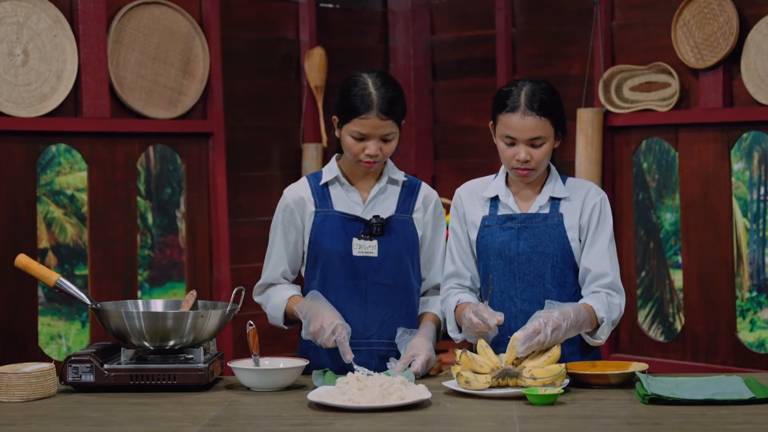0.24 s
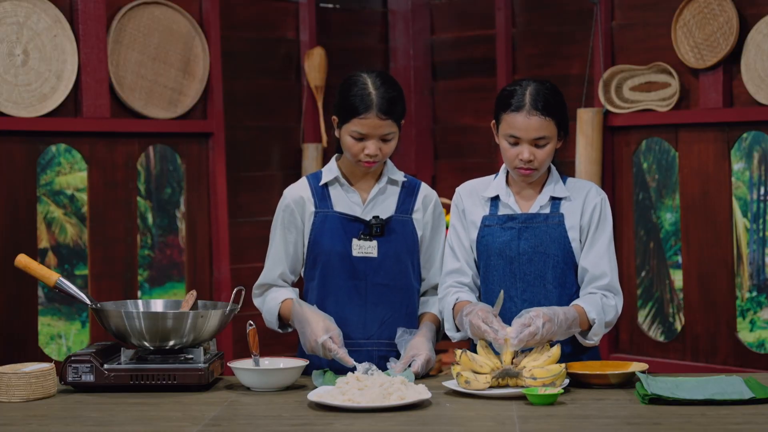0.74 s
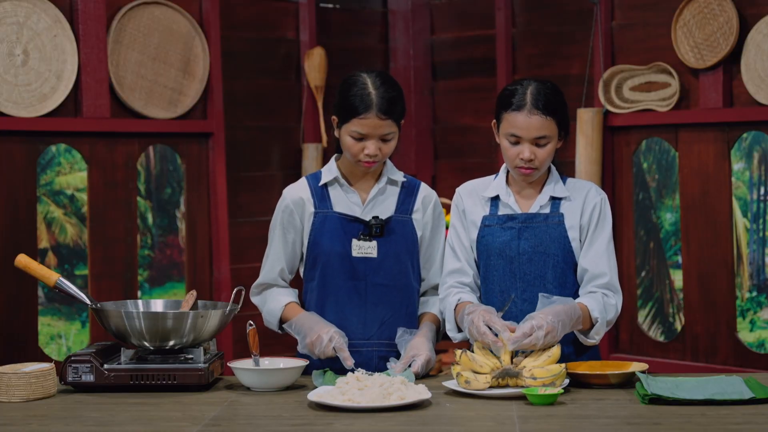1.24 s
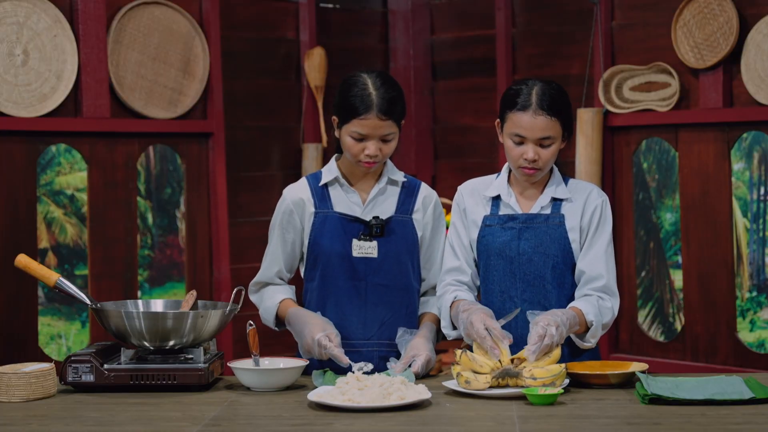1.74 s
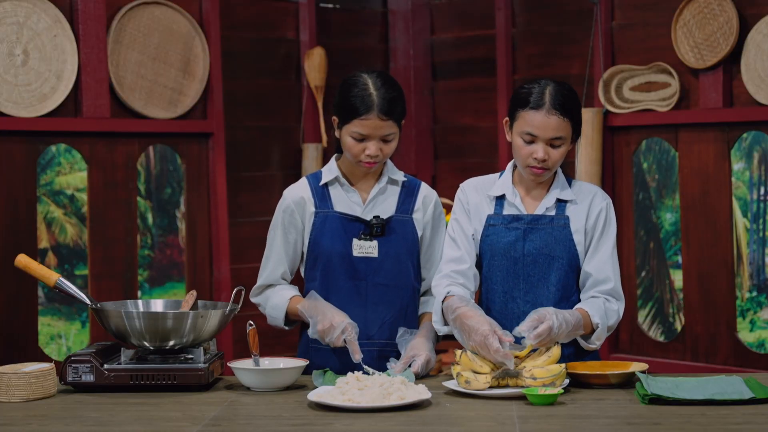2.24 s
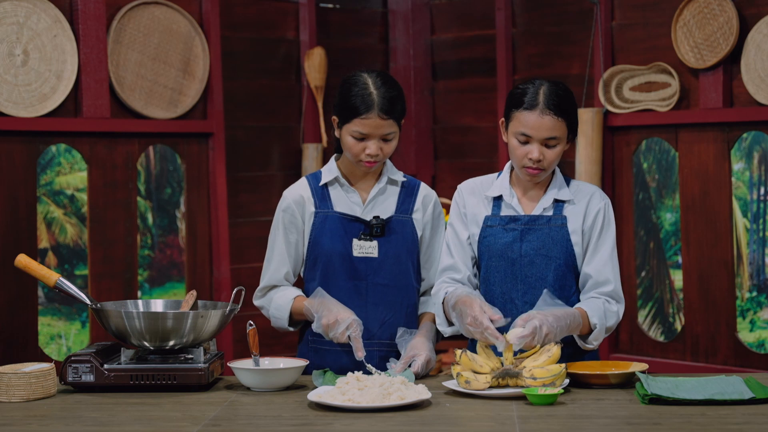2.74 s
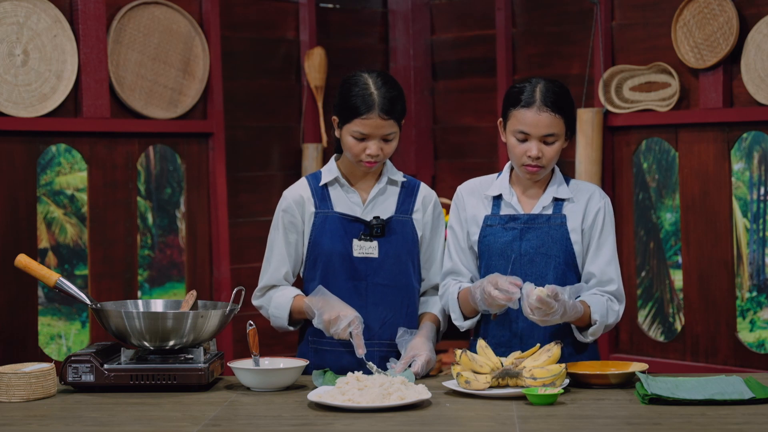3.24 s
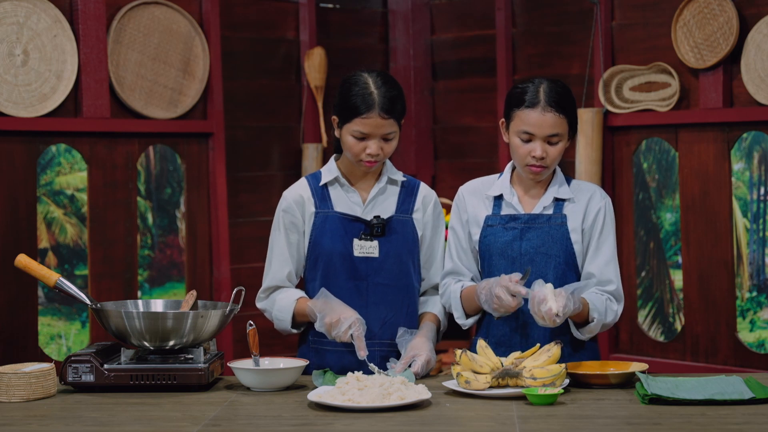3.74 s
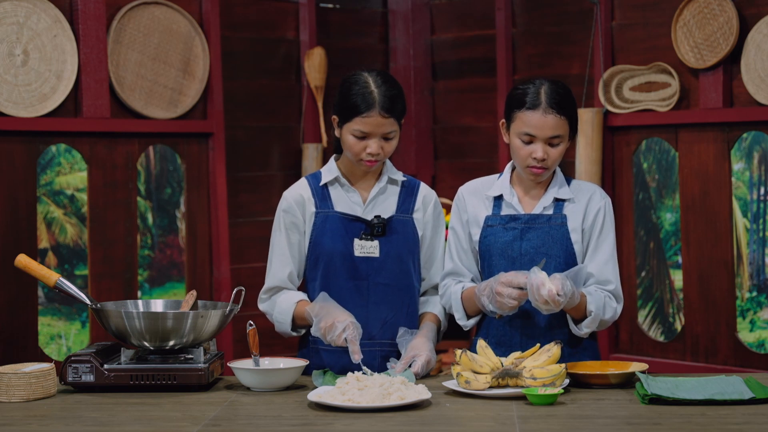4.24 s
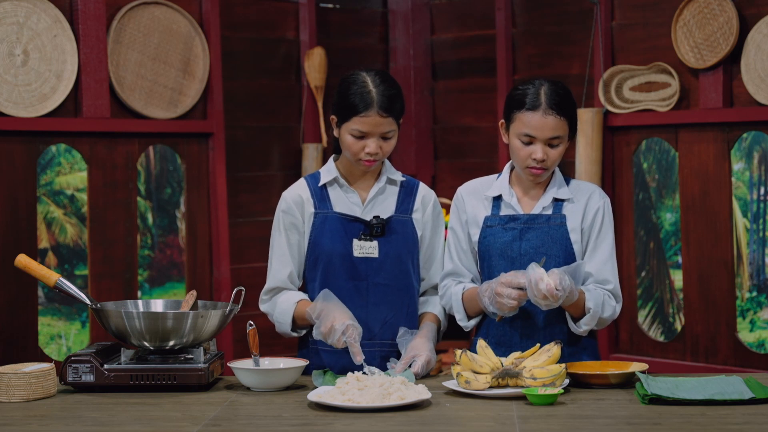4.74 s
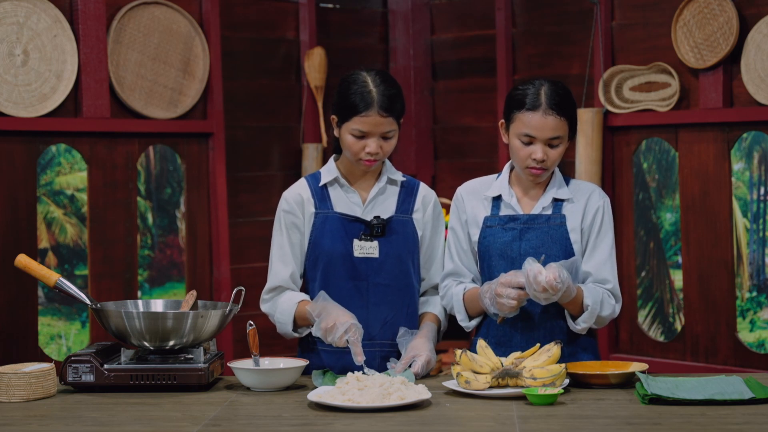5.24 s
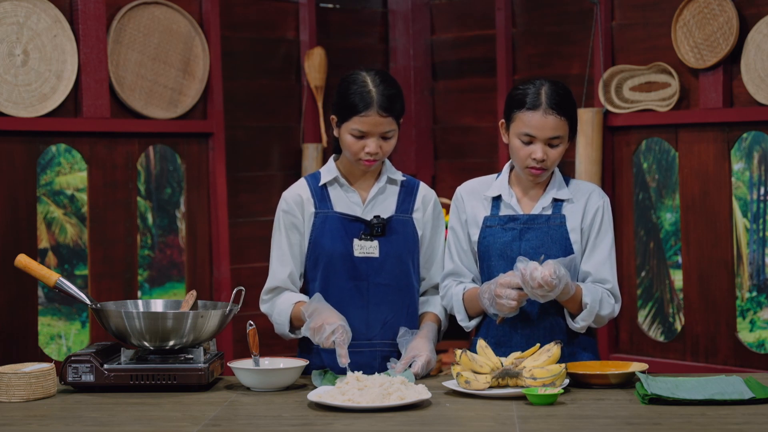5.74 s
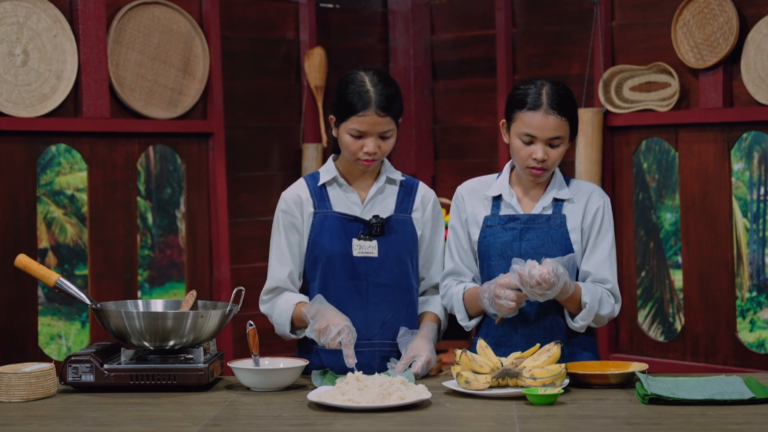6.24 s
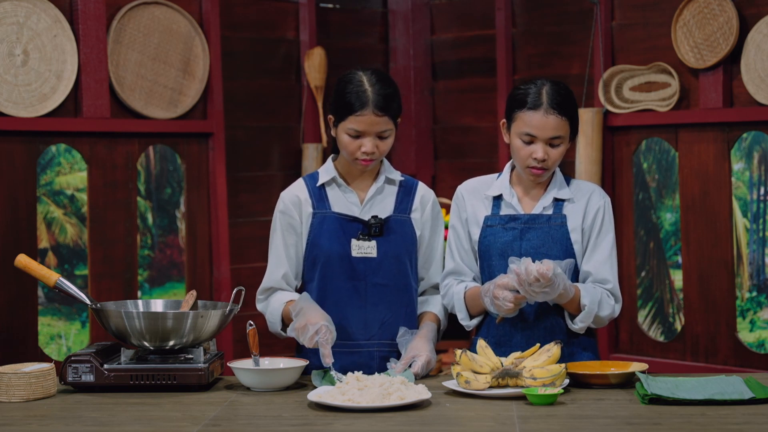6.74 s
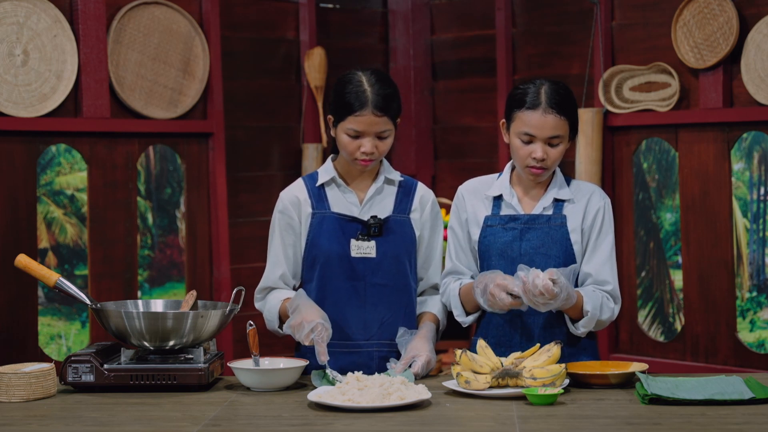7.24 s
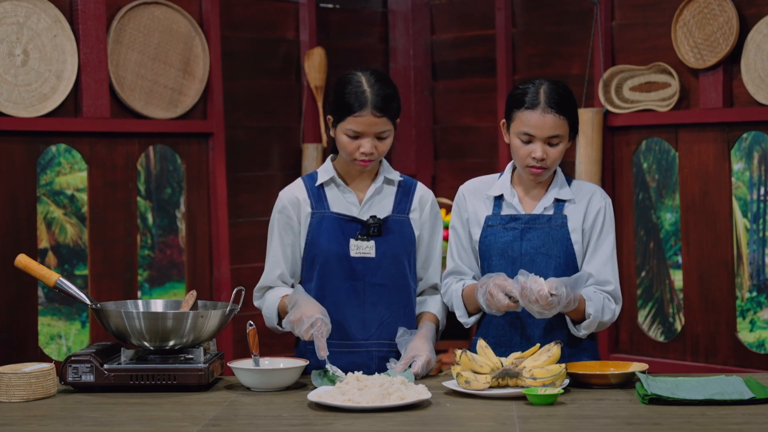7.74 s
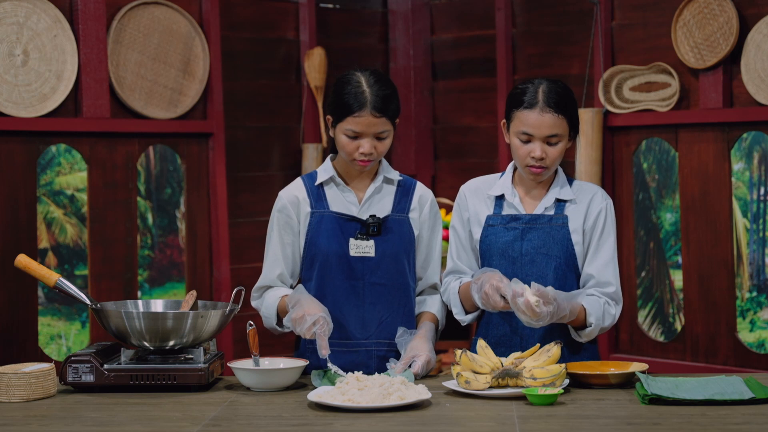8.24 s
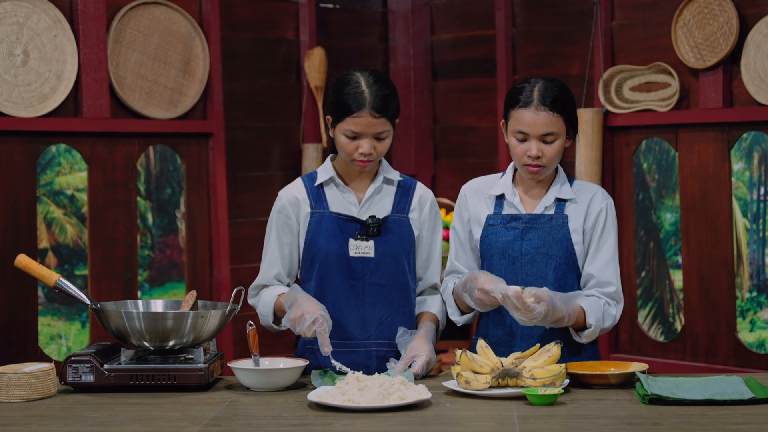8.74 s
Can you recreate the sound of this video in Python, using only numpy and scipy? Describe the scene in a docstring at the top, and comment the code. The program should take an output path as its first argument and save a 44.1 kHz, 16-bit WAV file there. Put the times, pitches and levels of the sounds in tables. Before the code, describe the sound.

Close clip-on microphone in a quiet indoor kitchen: flimsy film gloves crackle, fizz and rustle as fingers grip and pull peel. Strokes are nearly continuous early, strongest around three and a half seconds, then slacken into thin ticking before picking up again near seven. Muffled taps and scuffs on soft fruit sit beneath. Low cloth-padded bumps arrive in groups above a faint bassy room rumble.

```python
"""Gloved hands peeling bananas

Two cooks in thin plastic gloves peel bananas and work at a plate in a wooden kitchen room.
The film buckles in clumps of tiny ringing clicks, with single louder snaps; shaped noise makes the
soft rubbing and tapping on the fruit. Body movements bump a clip-on microphone: each dull thump is
a short low push and rebound. Steady coloured noise gives the low room rumble."""
import sys
import numpy as np
from scipy import signal
from scipy.fft import rfft, irfft, next_fast_len
from scipy.io import wavfile
from scipy.ndimage import uniform_filter1d, map_coordinates

SR = 44100
rng = np.random.default_rng(int(sys.argv[2]) if len(sys.argv) > 2 else 0)


def unload_audio(sound):
    """Save the sound as a 16-bit wav file, at the path given as the first command line argument."""
    columns = np.transpose(np.atleast_2d(sound))
    # keep every value between -1 and 1, then stretch to whole-number steps
    steps = np.round(np.clip(columns, -1, 1) * 32767)
    wavfile.write(sys.argv[1], SR, steps.astype(np.int16))


N = 396900
TOP_HZ = 15850  # nothing is recorded above this


def amp(db):
    """Decibels to gain."""
    return 10 ** (np.asarray(db) / 20)


def unit(x):
    """x at rms 1."""
    return x / np.sqrt(np.mean(x ** 2) + 1e-20)


def even(x, span):
    """x at rms 1 over every stretch of span seconds."""
    power = np.abs(uniform_filter1d(x ** 2, int(span * SR) + 1))
    return x / np.sqrt(power + 1e-9)


def along(points, hz):
    """(Hz, value) points read on a log axis."""
    f, v = np.transpose(points)
    return np.interp(np.log(hz + 1), np.log(f + 1), v)


def curves(rows):
    """One value per sample for each column after the time."""
    s, *cols = np.transpose(rows)
    return [np.interp(np.arange(N) / SR, s, c) for c in cols]


def wobble(rate):
    """A smooth random curve through rate random points a second."""
    points = rng.standard_normal(int(N * rate / SR) + 4)
    return map_coordinates(points, [np.arange(N) * rate / SR])


def below(x, hz):
    """The part of x under a frequency, with no delay."""
    return signal.sosfiltfilt(signal.butter(3, hz, fs=SR, output="sos"), x)


def coloured(x, gain):
    """x through a filter that never sounds ahead of its input; gain is a function of frequency."""
    m = 2 * next_fast_len(N // 2 + SR // 4)
    log_gain = np.log(np.maximum(gain(np.fft.rfftfreq(m, 1 / SR)), 1e-6))
    # folding the cepstrum onto positive times gives the minimum-phase response
    cepstrum = irfft(log_gain)
    cepstrum[1:m // 2] *= 2
    cepstrum[m // 2 + 1:] = 0
    return irfft(rfft(x, m) * np.exp(rfft(cepstrum)), m)[:N]


def noise(spectrum):
    """Noise of rms 1 with a given colour."""
    return unit(coloured(rng.standard_normal(N), lambda hz: amp(along(spectrum, hz))))


def scattered(x, t60, wet_db):
    """x plus a diffuse noise tail, redrawn at random every short block; t60 is its 60 dB decay in s."""
    t = np.arange(int(t60 * SR) + 2) / SR
    out = np.zeros(N + len(t))
    hop = max(SR // 100, len(t) // 2)
    for i in range(0, N, hop):
        tail = rng.standard_normal(len(t)) * amp(-60 * t / t60)
        echo = signal.fftconvolve(x[i:i + hop], tail / np.linalg.norm(tail))
        out[i:i + len(echo)] += echo
    return x + amp(wet_db) * out[:N]


# Steady colour of the room's rumble. Each row: frequency in Hz, relative level in dB per Hz.
ROOM_COLOUR = [(15, -3), (32, -6), (47, 5), (62, -9), (100, -13.5), (160, -17.5), (300, -22.5),
               (520, -27.5), (680, -23), (950, -28.5), (3000, -30), (7000, -43), (12000, -43), (16000, -60)]


def room_rumble():
    """Steady noise of the room, strongest in the bass."""
    return amp(-52.0) * noise(ROOM_COLOUR)


# Bumps on the microphone.
# Each row: time in seconds, peak in dB before the thump's overall level_db, pitch in Hz.
MICROPHONE_BUMPS = [(0.498, -19.5, 47), (0.59, -20, 21.5), (0.651, -17.5, 53), (0.745, -25, 46),
                    (0.819, -28, 45), (0.886, -29.5, 41), (0.991, -26.5, 20.5), (1.143, -42, 22),
                    (2.546, -29.5, 26), (2.7, -36, 58), (2.779, -28, 29), (2.885, -28.5, 21),
                    (2.98, -44, 27), (3.129, -39, 45), (4.53, -38, 25), (4.652, -26, 26.6),
                    (4.769, -35, 36), (5.06, -38, 15), (6.456, -31, 48), (6.524, -25, 27),
                    (6.57, -26.5, 56), (6.620, -22, 34), (6.854, -23, 33), (7.078, -33, 27),
                    (8.747, -26, 44), (8.855, -29.5, 8.9), (8.944, -27.5, 33)]


def after_bumps(rise_s, decay_s, db_per_octave):
    """An envelope that rises into every bump and dies away after it; the bump's pitch sets its size."""
    reference_bump_hz = 40.8
    t = np.arange(0, N / SR + .002, .002)
    power = np.zeros_like(t)
    for s, db, hz in MICROPHONE_BUMPS:
        size = amp(db + db_per_octave * np.log2(hz / reference_bump_hz))
        shape = np.exp(-np.maximum((s - t) / rise_s, (t - s) / decay_s))
        power += (size * shape) ** 2
    return curves(np.column_stack([t, np.sqrt(power)]))[0]


def apron_sway():
    """The apron sways on around each bump: deep noise that follows the bumps."""
    sway = noise([(6, -20.5), (18, 14), (35, -0.5), (70, -13), (140, -43), (400, -107)])
    return amp(-11.5) * after_bumps(rise_s=0.014, decay_s=.13, db_per_octave=-2.5) * sway


# Colour of the cloth scuff. Each row: frequency in Hz, relative level in dB per Hz.
SCUFF_COLOUR = [(30, -18), (70, 5.5), (120, -9), (180, -14), (400, -56)]


def cloth_scuff():
    """The apron's cloth scuffs the microphone briefly, more for quick bumps than for slow ones."""
    envelope = after_bumps(rise_s=0.0083, decay_s=0.054, db_per_octave=15)
    return amp(-20) * envelope * noise(SCUFF_COLOUR)


def bumps(level_db, skew, length, softness):
    """Each bump is one push and rebound, rounded by cloth, with the apron's sway and scuff."""
    lead_in = 0.69  # a bump sets in faster than it dies: lead-in length over tail length
    out = np.zeros(N + SR)
    t = np.arange(-SR // 6, SR // 6) / SR
    for s, db, hz in MICROPHONE_BUMPS:
        turns = hz * t
        distance = np.hypot(np.where(t < 0, turns / lead_in, turns), softness)
        push = np.cos(2 * np.pi * turns + skew) * np.exp((softness - distance) / length)
        out[round((s + t[0]) * SR):][:len(t)] -= amp(db + level_db) * push
    return out[:N] + apron_sway() + cloth_scuff()


# Strokes of the fingers, each one grip or pull on the peel.
# Each row: start in seconds, length in seconds, crackle level in dB before crinkle() balances its bands,
# tautness as treble tilt in dB, rub against the crackle in dB before rubbing() trims it.
FINGER_STROKES = [(0.124, 0.27, -46.0, 1, -7), (0.48, 0.1, -47, 1.5, -9), (0.57, 0.21, -45.0, 0.5, -5.5),
                  (0.79, 0.047, -49, -1.5, -7), (0.884, 0.086, -51, -1, -4.5),
                  (1.055, 0.18, -50.5, -0.5, -8.0), (1.22, 0.21, -46, 0, -6.5), (1.443, 0.22, -46, 0, -7.0),
                  (1.733, 0.2, -48.5, 2.5, -8), (2.013, 0.05, -43.5, 4.5, -17), (2.158, 0.35, -47.0, 1, -5),
                  (2.353, 0.27, -45.5, 1.5, -5), (2.665, 0.25, -45.5, 1.5, -8.5),
                  (3.032, 0.13, -47.5, 1, -7), (3.26, 0.078, -45, 1, -7.5), (3.373, 0.1, -42, 1.5, -10),
                  (3.485, 0.35, -44, 2, -8), (3.82, 0.14, -47.5, 3.5, -9.5), (4.051, 0.11, -48.0, 3, -9),
                  (4.15, 0.16, -52.5, 1.5, -7.0), (4.725, 0.089, -57, -3.0, -14),
                  (4.885, 0.16, -56, -1, -3), (5.279, 0.095, -53.5, -1.5, -2), (5.497, 0.092, -55, 3, -12),
                  (6.09, 0.12, -52, -1, -5), (6.403, 0.041, -47, -1, -9.5), (6.482, 0.21, -52, 0, -8),
                  (6.707, 0.12, -52.5, -3.5, -7.5), (6.88, 0.05, -45.5, -0.5, -12),
                  (6.952, 0.12, -50, -1.0, -3.5), (7.046, 0.088, -45, 2.5, -5),
                  (7.149, 0.17, -45.5, 1.5, -10), (7.344, 0.12, -50.5, 3.5, -12.5),
                  (7.92, 0.053, -51, 0, -6), (8.126, 0.11, -47, -2.5, -5), (8.276, 0.17, -49.5, 0.5, -7),
                  (8.468, 0.17, -46, 1, -7.5), (8.705, 0.11, -49.5, -1, -4),
                  (8.843, 0.052, -49, -0.5, -6.5), (8.916, 0.063, -46.5, -1, -8)]
# Small finger movements between the strokes. Each row: time in seconds, crackle level in dB as above.
FIDGETING = [(0, -53.5), (1.0, -52.5), (1.4, -50.5), (3.1, -50.5), (4.0, -52.5), (4.45, -57.5), (5.15, -61),
             (5.7, -55), (6.0, -58.5), (6.3, -55), (7.2, -54), (7.6, -55), (8.02, -56), (8.12, -50.5),
             (8.5, -54), (9.0, -58.5)]


def hands():
    """Crackle level, tautness and rub in dB: each stroke takes over from the fidgeting for a while."""
    attack_s, release_s = 0.052, .055
    slack_tilt_db, slack_rub_db = 1.5, -7.5  # tautness and rub between the strokes
    # random level flicker: its depth in dB during and between strokes, and its changes per second
    tremor_db, fits_db, tremor_per_s = 0.83, 1, 95
    t = np.arange(0, N / SR + .002, .002)
    idle_db = np.interp(t, *np.transpose(FIDGETING))
    idle = [np.full_like(t, db) for db in (slack_tilt_db, slack_rub_db, fits_db)]
    state = np.column_stack([idle_db, *idle])
    for start, length, *grip in FINGER_STROKES:
        set_in = np.clip((t - start) / attack_s + .5, 0, 1)
        let_go = np.clip((start + length - t) / release_s + .5, 0, 1)
        hold = (set_in * let_go)[:, None]
        state = state + hold * ([*grip, tremor_db] - state)
    level_db, tilt_db, rub_db, depth_db = curves(np.column_stack([t, state]))
    # the film gives way in quick fits, a little deeper between strokes
    crackle_db = level_db + depth_db * wobble(tremor_per_s)
    return crackle_db, tilt_db, level_db + rub_db


# Fingertips and fruit touching softly.
# Each row: time in seconds, peak in dB before the overall level_db, pitch in Hz.
SOFT_TAPS = [(0.925, -39, 581), (1.232, -40, 694), (2.551, -35.5, 527), (2.743, -35.5, 520),
             (3.394, -38, 589), (4.744, -40, 553), (5.525, -41, 605), (6.703, -38, 366), (6.896, -41, 283),
             (8.351, -40.5, 620), (8.486, -42, 500)]


def taps(t60, level_db):
    """Soft flesh gives a dead, broad knock with almost no ring: a short burst of filtered noise."""
    out = np.zeros(N + SR)
    t = np.arange(SR // 10) / SR
    for s, db, hz in SOFT_TAPS:
        burst = rng.standard_normal(len(t)) * amp(-60 * t / t60)
        band = [hz / 1.47, hz * 1.21]
        thud = signal.lfilter(*signal.butter(2, band, "band", fs=SR), burst)
        out[round(s * SR):][:len(t)] += amp(db + level_db) * thud / np.abs(thud).max()
    return out[:N]


# Colour of film rubbing on fruit. Each row: frequency in Hz, relative level in dB per Hz.
RUB_COLOUR = [(60, -11.5), (110, 0.5), (190, -5.5), (260, -1.5), (340, 0.5), (500, 2), (680, 0),
              (800, -12.5), (930, -12.5), (1150, -10), (1600, -42.5)]


def rubbing(rub_db):
    """The film sticks and slips on the fruit in soft, hollow scuffs: noise in random swells."""
    stick_slip = amp(1.67 * wobble(40) + 2.5 * wobble(170))
    return amp(rub_db - 0.5) * unit(noise(RUB_COLOUR) * stick_slip)


# Single creases snapping through, each sounding 1 ms after its listed time.
# Each row: time in seconds, peak in dB, pitch in Hz, time for the flutter to fall 60 dB in seconds.
CREASE_SNAPS = [(0.1032, -29, 7530, .012), (0.2354, -26, 8140, .006), (0.3331, -28, 2150, .016),
                (0.4479, -27, 10600, .006), (0.6799, -27.5, 3100, .02), (0.7213, -23.5, 6590, .022),
                (0.9273, -26, 6570, .025), (1.4067, -29, 2130, .01), (2.4234, -25, 5060, .006),
                (2.4299, -21, 5950, .028), (2.4658, -23, 11200, .02), (3.0769, -26, 6550, .025),
                (3.4156, -23, 5000, .012), (3.5364, -20, 6720, .018), (3.6032, -22, 6570, .016),
                (4.6264, -29.5, 2870, .01), (4.6733, -36, 2800, .012), (4.79, -33, 5450, .01),
                (4.8314, -26, 2230, .004), (4.9561, -25, 5900, .005), (5.448, -31, 2430, .006),
                (5.471, -33, 5830, .012), (5.5278, -27, 4330, .01), (5.7728, -30, 6790, .007),
                (5.8217, -34, 6850, .01), (5.8731, -31, 5800, .022), (6.1254, -30, 5780, .012),
                (6.1469, -17.5, 7700, .004), (6.1664, -28, 6740, .018), (6.1964, -31, 6980, .008),
                (6.2632, -34, 3160, .007), (6.3185, -30, 5380, .007), (6.7865, -26, 10800, .007),
                (7.0633, -25, 7320, .025), (7.1062, -25, 5450, .02), (7.6779, -26.5, 8520, .02),
                (7.8022, -33, 7250, .007), (7.8725, -30, 5600, .022), (8.0611, -26, 5440, .008),
                (8.1379, -29, 6770, .01), (8.1818, -26, 3890, .012), (8.206, -27, 6500, .02),
                (8.379, -29, 5800, .02), (8.3954, -29, 5080, .007), (8.4841, -25, 8020, .018),
                (8.537, -29, 3930, .007)]


def snaps(cycles, rise_turns, flutter_db, flutter_width):
    """A crease flips with a short ring, and the film around it flutters in a band about that pitch."""
    out = np.zeros(N + SR)
    t = np.arange(SR // 50) / SR
    for s, db, hz, flutter_t60 in CREASE_SNAPS:
        turns = hz * t
        ring = np.sin(2 * np.pi * turns) * np.exp(-turns / cycles)
        ring *= (1 - np.exp(-turns / rise_turns)) ** 2
        band = [hz / 1.45, min(hz * flutter_width, 12500)]
        flutter = signal.lfilter(*signal.butter(2, band, "band", fs=SR), rng.standard_normal(len(t)))
        fading = amp(flutter_db - 60 * t / flutter_t60) * unit(flutter)
        snap = ring / np.abs(ring).max() + fading
        out[round((s + .001) * SR):][:len(t)] += amp(db) * snap / np.abs(snap).max()
    return out[:N]


def buckles(rate, clump_db, spread_db, cap, cycles, low_hz, size=64):
    """Clumped clicks of a thin film, rate a second on average, each ringing for about a cycle."""
    # creases give way in little avalanches, wherever the stress peaks
    stress = amp(clump_db * np.clip(.8 * wobble(125) + .55 * wobble(400), -2, 2))
    due = np.cumsum(stress) / stress.sum()
    when, pitch, force, side = rng.random((int(rate * N / SR), 4)).T
    start = np.searchsorted(due, when)
    hz = low_hz * (TOP_HZ / low_hz) ** np.sqrt(pitch)
    # few clicks are strong; the pitch factors balance the spectrum
    strength = amp(spread_db * np.minimum(-np.log(1 - force), cap)) * hz / (pitch + .05) ** (1 / 4)
    signed = (strength * np.sign(side - .5))[:, None]
    turns = hz[:, None] * np.arange(size) / SR
    rings = signed * np.exp(-turns / cycles) * np.sin(2 * np.pi * turns)
    places = start[:, None] + np.arange(size)
    return unit(np.bincount(places.ravel(), rings.ravel(), N + size)[:N])


# Resonances of the cupped gloves. Each row: centre in Hz, width in Hz, relative boost in dB.
GLOVE_HOLLOW = [(2450, 250, 1.5), (5170, 770, 4), (6730, 390, 1.5)]


def cupped(film):
    """The hollow of the glove lifts a few bands of the crackle."""
    def gain(hz):
        return amp(sum(db / (1 + (2 * (hz - centre) / width) ** 2) for centre, width, db in GLOVE_HOLLOW))
    return coloured(film, gain)


# Colours of the film with hands at the plate and at the chest.
# Each row: frequency in Hz, relative level in dB per Hz.
PLATE_COLOUR = [(410, -40), (700, -2.5), (930, -10), (1400, -2.5), (2300, -1.5), (3300, -4), (4200, -0.5),
                (5150, -0.5), (7300, 1), (10500, 3), (13500, 0), (14700, -6), (15800, 0)]
CHEST_COLOUR = [(410, -27.5), (700, -6.5), (980, -13), (1400, -6), (2100, -8), (2800, -2.5), (3400, -5),
                (4000, -2.5), (4650, -5), (5450, -1.5), (8300, -2.5), (13300, -10), (14700, -15.5),
                (15800, -17.5)]


def hands_rising(film):
    """The colour of the film changes as the hands rise from the plate to the chest."""
    raised = np.clip((np.arange(N) / SR - 2.7) / 1.1, 0, 1)  # starts at 2.7 s, takes 1.1 s
    at_plate = unit(coloured(film, lambda hz: amp(along(PLATE_COLOUR, hz))))
    at_chest = unit(coloured(film, lambda hz: amp(along(CHEST_COLOUR, hz))))
    return (1 - raised) * at_plate + raised * at_chest


def crinkle(fine_db, tilt_db):
    """Busy fingers give a dense crackle on a sliding hiss, slow ones sparse ticks."""
    busy = np.clip((fine_db + 58.5) / 12, .2, .9)
    dense = buckles(rate=6000, clump_db=9, spread_db=5.5, cap=5.3, cycles=0.84, low_hz=624)
    slide = amp(2.5) * rng.standard_normal(N)
    sparse = buckles(rate=1200, clump_db=11, spread_db=9.5, cap=2.6, cycles=0.91, low_hz=633)
    film = np.sqrt(busy) * unit(dense + slide) + np.sqrt(1 - busy) * sparse
    # each click spreads through the sheet
    film = scattered(film, t60=.009, wet_db=-14.0)
    film = hands_rising(cupped(film))
    # slack film bends in broad folds, taut film fizzes
    folds, body = below(film, hz=3480), below(film, hz=10230)
    parts = [(-4 - tilt_db, folds), (-1, body - folds), (-5.7 + tilt_db, film - body)]
    return sum(amp(fine_db + db - 0.44) * even(part, span=0.073) for db, part in parts)


def scene():
    """Gloves in a room with a short echo, microphone bumps and the room's rumble."""
    crackle_db, tilt_db, rub_db = hands()
    gloves = taps(t60=0.037, level_db=-3.5) + rubbing(rub_db)
    gloves += snaps(cycles=1.6, rise_turns=0.39, flutter_db=-4.5, flutter_width=1.87)
    gloves += crinkle(crackle_db, tilt_db)
    in_room = scattered(gloves, t60=.35, wet_db=-15.5)
    thumps = bumps(level_db=2.0, skew=0.13, length=0.65, softness=0.018)
    return (room_rumble() + thumps + in_room)[None]


def record(dry):
    """The recorder's treble rounds off, then stops at its band limit."""
    m = next_fast_len(N + SR // 4)
    hz = np.fft.rfftfreq(m, 1 / SR)
    response = (hz < TOP_HZ) / np.sqrt(1 + (hz / 14900) ** 44)
    return irfft(rfft(dry, m) * response, m)[..., :N]


dry = scene()
out = record(dry)
unload_audio(out)
```